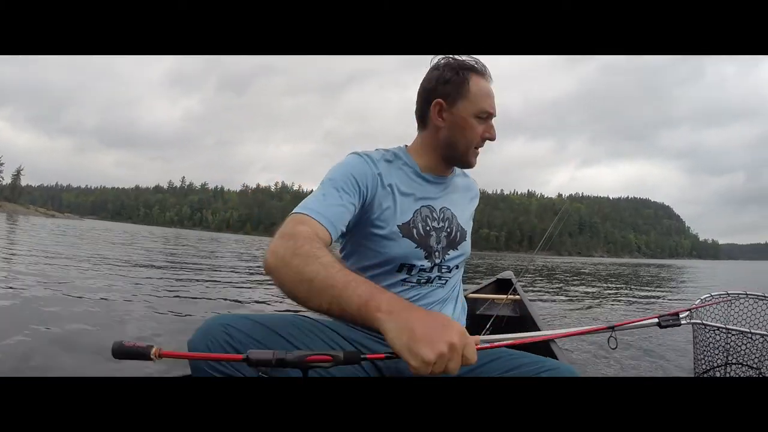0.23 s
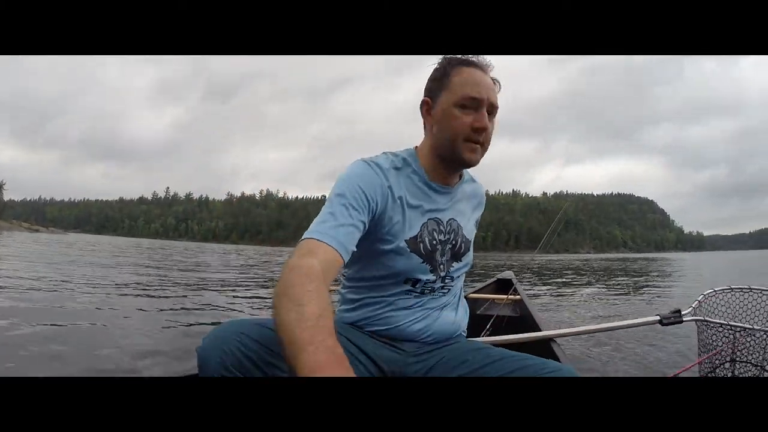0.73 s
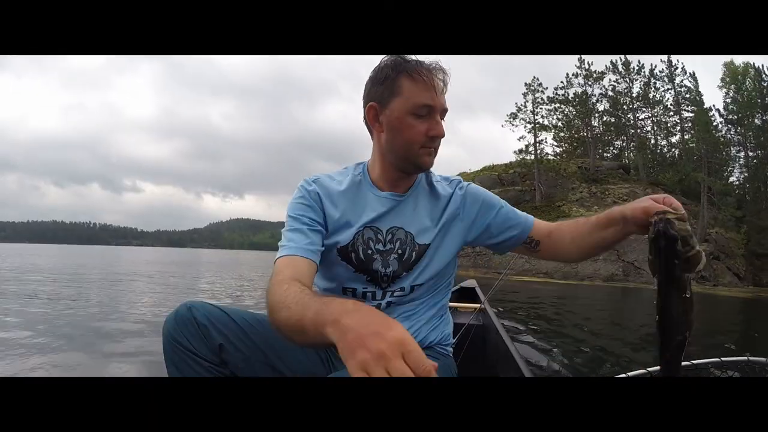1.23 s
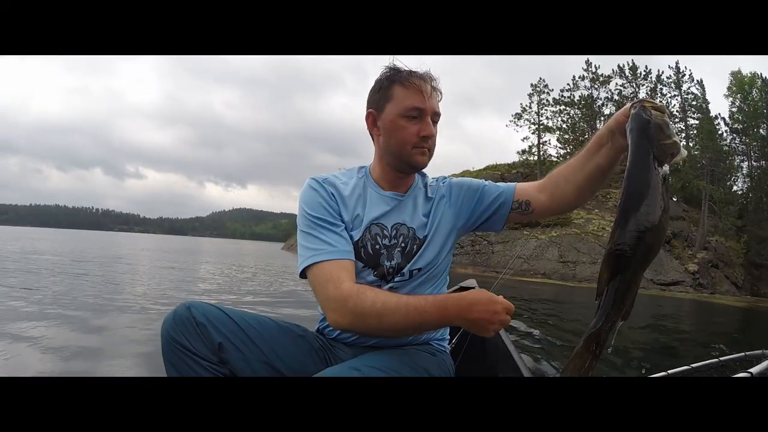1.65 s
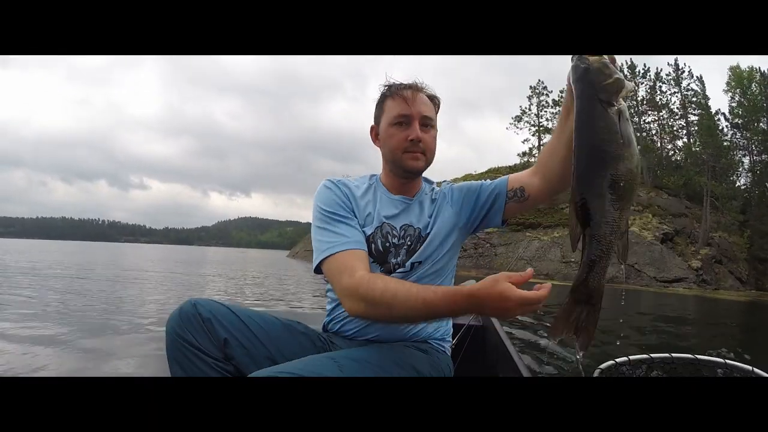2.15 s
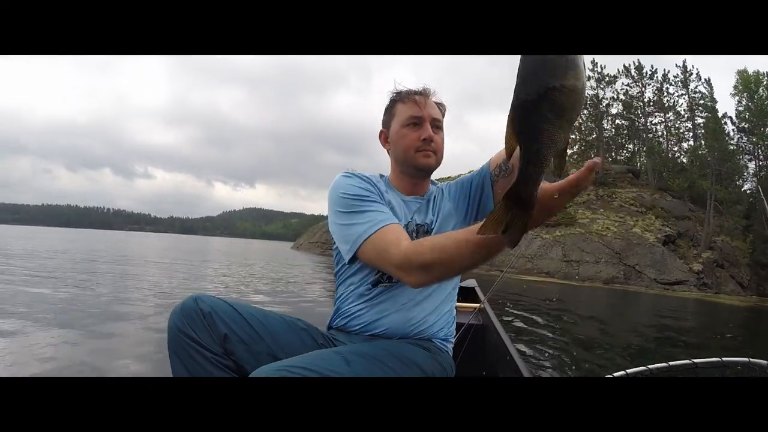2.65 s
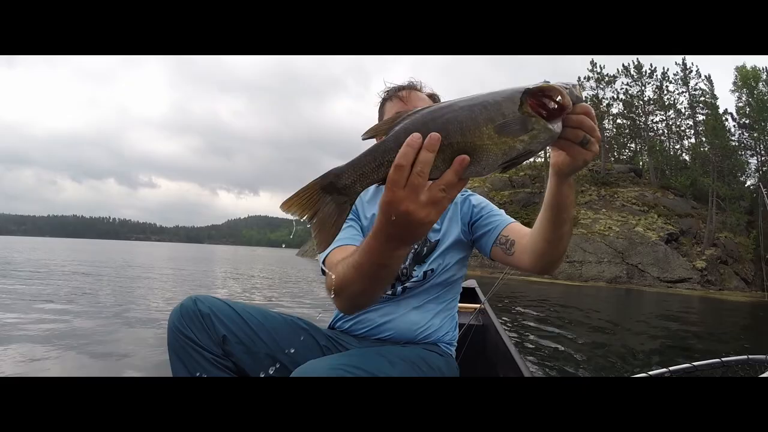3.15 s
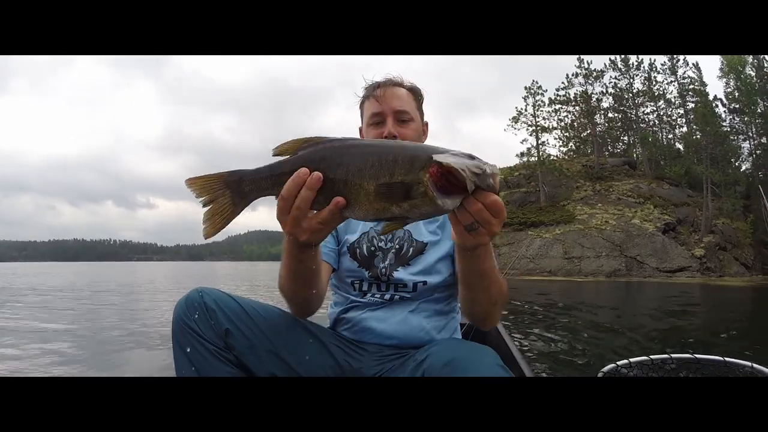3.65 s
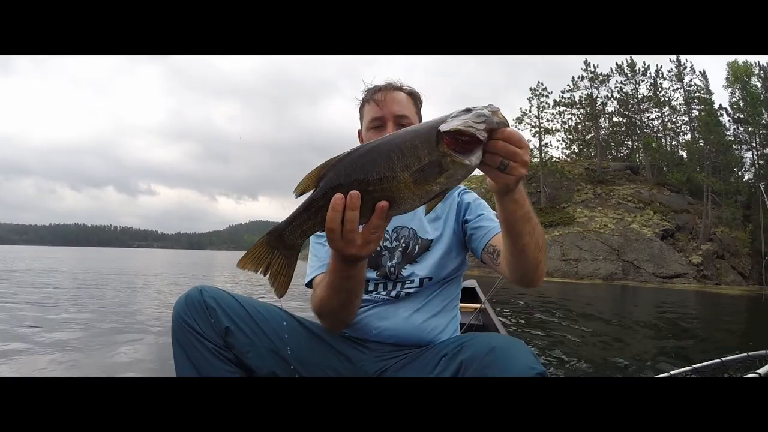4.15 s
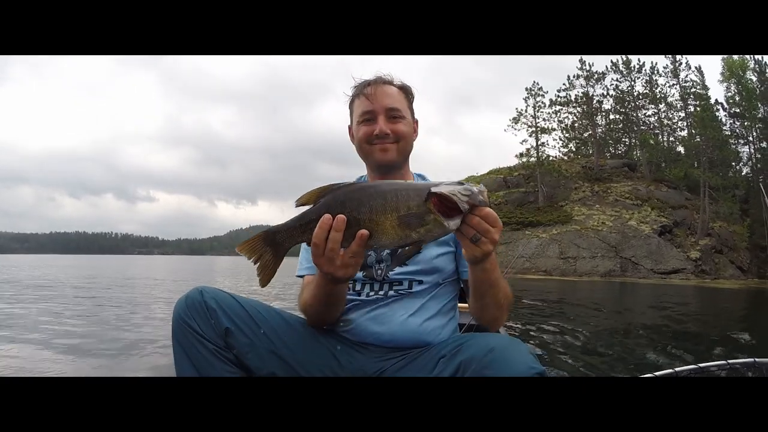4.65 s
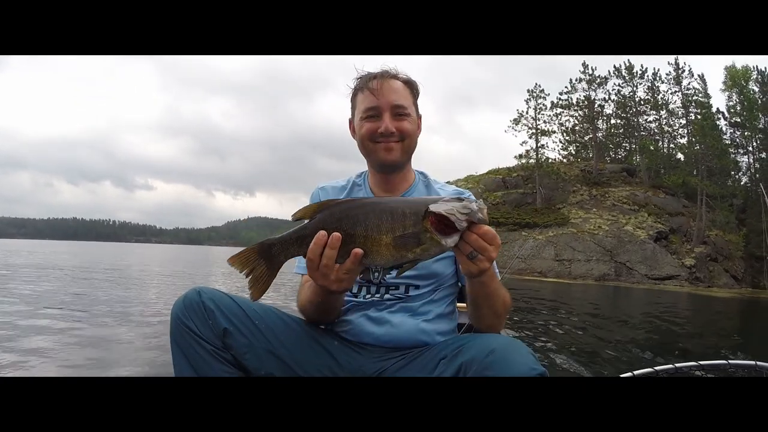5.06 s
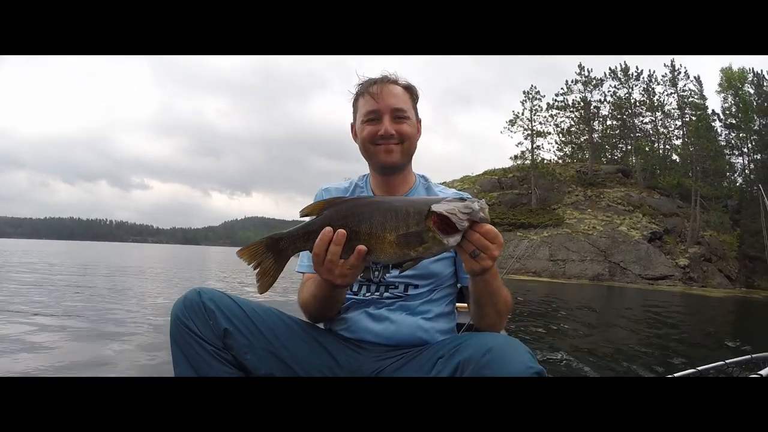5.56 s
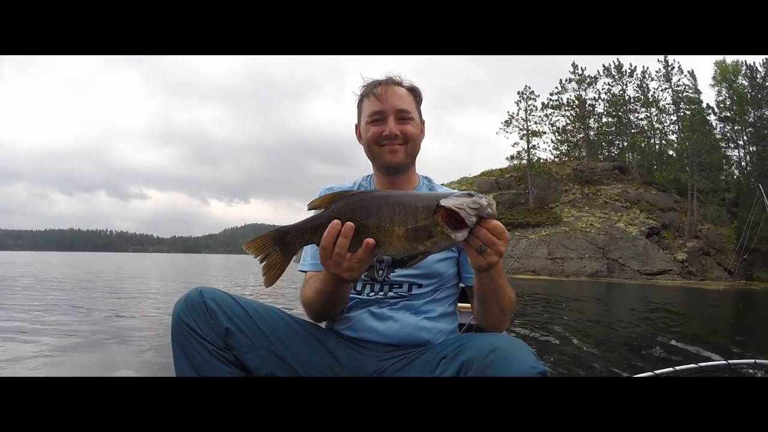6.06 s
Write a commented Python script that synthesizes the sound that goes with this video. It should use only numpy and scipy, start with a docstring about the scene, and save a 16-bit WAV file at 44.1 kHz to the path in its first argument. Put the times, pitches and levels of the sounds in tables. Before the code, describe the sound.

A canoe on a calm lake, heard very close through a camera mounted on its hull. From 0 s, low wind rumble, hiss and a very faint, high pulsing electronic whine sit beneath light taps, scuffs and rod buzz. A hollow knock with a deep thump lands at 0.27 s, then the loudest, a hard overloaded bang, at 0.55 s; the background drops sharply afterwards. More knocks and a rough scrape come at 0.8-0.95 s, with small scuffs and taps until 1.25 s. Rubbing and a short scrape around 1.8 s precede a soft low thud at 2.0 s. Faint bumps continue, with a small scuff at 3.07 s. A sudden close pair of woody clunks hits at 3.4 s, and the background ducks again. Hiss returns by 4.1 s; a tiny falling squeak sounds at 4.38 s, then only barely audible bumps, the last near 6 s, ending at 6.3 s.

```python
"""A canoe on a calm lake, heard by a small camera clamped to the hull while an angler lays down a rod and lifts a fish.
From the start knocks excite the hull's panel modes, thumps its four deep bending modes, and friction noise drives
the panels as scrapes and rubbing, while tapped rod modes buzz; the loudest knock falls at 0.55 s. Sparser, softer
contacts follow until a burst near 3.4 s, then a short sine squeak at 4.38 s and faint last bumps.
Throughout lie filtered-noise wind rumble and hiss, and gated sine tones: a faint whine pulsing with the frames."""
import sys
import numpy as np
from scipy import signal
from scipy.fft import rfft, irfft
from scipy.io import wavfile
from scipy.ndimage import uniform_filter1d

SR = 44100
rng = np.random.default_rng(int(sys.argv[2]) if len(sys.argv) > 2 else 0)


def to_wav(sig):
    """Store sig (one row per channel, or 1-D mono) as 16-bit WAV at the path in sys.argv[1].

    Samples outside -1..1 are clipped; the rate is SR.
    """
    pcm = np.clip(np.atleast_2d(sig), -1, 1) * 32767
    pcm = np.round(pcm).astype(np.int16)
    wavfile.write(sys.argv[1], SR, pcm.T)  # frames by channels


def magnitude_from_level(level_db):
    """Linear magnitude for a level in decibels (20 dB per decade)."""
    exponent = np.asarray(level_db, float) / 20
    return 10 ** exponent


N = 277830
T = np.arange(N) / SR


def level(x, db):
    """Root-mean-square normalisation: scales a sound to an rms level."""
    return x * magnitude_from_level(db) / np.sqrt(np.mean(x ** 2))


def gain_over_time(table):
    """Gain envelope: decibels joined by straight lines between the times of a table."""
    s, db = np.transpose(table)
    return magnitude_from_level(np.interp(T, s, db))


def shaped(x, gain):
    """Linear filtering: multiplies the spectrum by a gain that is a function of Hz."""
    return irfft(rfft(x) * gain(np.maximum(np.fft.rfftfreq(N, 1 / SR), 1)), N)


def ringing(hz, modes):
    """Modal superposition: sums the resonance curves of modes under a steady push."""
    response = 0
    for mode_hz, db, t60 in modes:
        detuning = 2j * np.pi * (hz - mode_hz) * t60 / np.log(1000)
        response = response + magnitude_from_level(db) / np.sqrt(t60) / (1 + detuning)
    return response


def wander(rate):
    """Random modulation: normal random levels, rate of them a second, joined by straight lines."""
    k = int(SR / rate)
    held = np.repeat(rng.standard_normal(N // k + 1), k)
    return uniform_filter1d(held, k)[:N]


def add(out, s, sound, peak_db):
    """Linear superposition: lays a sound at time s, scaled to the given peak."""
    i = int(s * SR)
    out[i:i + len(sound)] += (sound * magnitude_from_level(peak_db) / np.abs(sound).max())[:N - i]


def colour_db(hz, near_hz, hard_db, focus_db, octaves):
    """Driving-point excitation: the nearest panel rings most, and harder contact is brighter."""
    focus = focus_db * np.exp(-(np.log2(hz / near_hz) / octaves) ** 2)
    return focus + hard_db * np.log2(hz / 600)


def spell(start, length, start_db, change_db, edge_s):
    """Contact envelope: the gain of a contact that begins, changes level evenly and ends."""
    contact = np.clip(np.minimum(T - start, start + length - T) / edge_s, 0, 1)
    return contact * magnitude_from_level(start_db + change_db * np.clip((T - start) / length, 0, 1))


# panel modes of the hull, also driven by scrapes and rubbing:
# mode_hz [Hz], relative_level_db [dB], t60_s before damping by the contact [s]
PANEL_MODES = [(241.4, -14, 0.26), (393, -15.5, 0.17), (422, 0.5, 0.078), (486.9, -8, 0.092),
               (570, -2.5, .08), (658, -8, 0.056), (690, -1.5, 0.057), (775, 0.5, 0.053), (934, 0, 0.056),
               (1010, 0, .06), (1170, -24.5, 0.15), (1434, -6.5, .06), (1550, -15, .05),
               (1788, -14.5, 0.079), (1970, -6.5, 0.055), (2336, -22.5, 0.11), (2600, -22, 0.096),
               (2850, -25, 0.053), (3233, -24.5, .09), (3840, -36, 0.046), (4550, -35.5, 0.052),
               (5300, -42.5, 0.011), (6200, -45, 0.045)]
# blows on the hull: start_s [s], peak_db of the ringing [dB], nearest_panel_hz [Hz],
# hardness_db [dB per octave], wide_panels_db [dB]
KNOCKS = [(0.004, -34, 1530, 11, 14), (0.149, -29.5, 434, 12.5, 5.5), (0.192, -33.5, 2580, 13, 8),
          (0.253, -21.5, 596, 1.7, 2), (0.269, -12, 556, 3.5, -3.5), (0.506, -24, 580, 10.5, 6.5),
          (0.548, 1.5, 605, 4.5, 8.5), (0.781, -32.5, 568, -15.5, -9.5), (0.808, -13.5, 537, 1, 1.5),
          (0.876, -19, 806, -0.8, 3.5), (1.013, -33, 990, 9.5, -2), (1.028, -29.5, 1010, 2, -2),
          (1.05, -31, 940, -1, -8), (1.114, -31.5, 1010, -1.5, -2.5), (1.139, -24, 960, -2, -9.5),
          (1.661, -40, 563, -3.5, 1), (1.776, -31.5, 890, 11, -18), (1.919, -38, 1970, 6, 5.5),
          (2.006, -46.5, 1100, 16, 6), (2.38, -45, 800, -2, -8), (2.518, -42, 474, -6.5, -14),
          (2.577, -35, 388, -2.5, -4), (2.604, -35, 575, -1.5, -2.5), (2.657, -48.5, 640, -6, 1),
          (2.761, -49.5, 590, 0, -19), (2.938, -44.5, 387, -5.5, -5), (3.066, -32.5, 1015, -1, -7),
          (3.255, -44, 477, -2, -8), (3.343, -38, 566, -3, 0), (3.386, -40, 386, -5, -10.5),
          (3.409, -10, 920, 4.5, -4.5), (3.423, -15, 833, -6.5, -12.5), (3.499, -39, 577, -8, -13),
          (4.322, -47, 570, -0.5, -2), (4.6, -52, 635, 1, -1), (4.833, -50.5, 575, -2, -6),
          (5.075, -41, 576, -1.5, -0.5), (5.331, -47, 563.5, -11, -1), (5.969, -50, 674.6, -4, 5)]


def knocks(focus_db=10, focus_octaves=0.29, tick_s=.004, tail_db=-24, chatter_db=-14, chatter_s=.007, thin_hz=2600):
    """Impact excitation: each blow rings all panels, the contact ticks and loose gear rattles on."""
    full_scale_contact_s, longer_per_db = .0018, .08  # contact lasts longer by this many dB for each dB lighter
    scatter_db, detune_share = 2.5, .012  # every blow lands elsewhere and loads the panels differently
    full_scale_ring, ring_per_db = .6, -0.02  # share of t60; lighter blows are damped less
    wide_below_hz = 520
    tick_db, rattle_db, bite_db_per_hardness = -49.5, -46, 2.3  # gain of noise; harder blows bite more
    rattle_hz, rattle_octaves, rattle_s = 2900, 0.32, .011  # loose gear shaken by a blow

    out, t = np.zeros(N), T[:SR // 5]
    hz, db, t60 = np.transpose(PANEL_MODES)[:, :, None]
    # the hand or gear still lying on the skin damps the high modes
    t60 = t60 / (1 + (hz / thin_hz) ** 2)
    chance = rng.standard_normal((len(KNOCKS), 3, len(PANEL_MODES), 1))
    bounces = rng.standard_normal((len(KNOCKS), SR // 30)) ** 3 * np.exp(-t[:SR // 30] / chatter_s)

    def click_gain(hz):
        return (hz / 3000) ** 2 / (1 + (hz / 3000) ** 3.6)

    def rattle_gain(hz):
        return ringing(hz, PANEL_MODES) * np.exp(-(np.log2(hz / rattle_hz) / rattle_octaves) ** 2)

    click = level(shaped(rng.standard_normal(N), click_gain), 0)
    shaken = magnitude_from_level(2.3 * wander(150)) * rng.standard_normal(N)
    loose = level(shaped(shaken, rattle_gain), 0)

    for knock, (offset, size, detune), bounce in zip(KNOCKS, chance, bounces):
        s, peak_db, near_hz, hard_db, wide_db = knock
        contact_s = full_scale_contact_s * magnitude_from_level(-longer_per_db * min(peak_db, 0))
        rise = 1 - np.exp(-(t / contact_s) ** 2)
        colour = colour_db(hz, near_hz, hard_db, focus_db, focus_octaves)
        gain = magnitude_from_level(db + colour + wide_db * (hz < wide_below_hz) + scatter_db * size)
        # most energy spreads away fast, a little rings on
        ring = np.clip(full_scale_ring + ring_per_db * peak_db, .1, 1)
        fade = 1000. ** (-t / (t60 * ring)) + magnitude_from_level(tail_db) * 1000. ** (-t / (2.0 * t60))
        # the panels peak about as the contact ends, each with a random phase offset
        phase = 2 * np.pi * hz * (1 + detune_share * detune) * (t - contact_s) + 0.95 * offset
        body = rise * (gain * np.cos(phase) * fade).sum(0)
        # the contact chatters in tiny bounces, each a weaker blow
        chatter = signal.fftconvolve(body, bounce / np.linalg.norm(bounce))[:len(t)]
        add(out, s, body + magnitude_from_level(chatter_db) * chatter, peak_db)
        bite_db, here = peak_db + bite_db_per_hardness * hard_db, int(s * SR)
        tick = rise * np.exp(-t / tick_s) * np.roll(click, -here)[:len(t)]
        rattle = rise * np.exp(-t / rattle_s) * np.roll(loose, -here)[:len(t)]
        add(out, s, tick, bite_db + tick_db)
        add(out, s, rattle, bite_db + rattle_db)
    return out


# deep bending modes of the whole hull, also driven by rocking: mode_hz [Hz], longest_t60_s [s]
DEEP_MODES = [(55, 1), (85, 0.65), (115, 0.57), (149, 0.68)]
# shifts of weight: start_s [s], peak_db before the bass cut [dB], second_mode_db against the third [dB],
# fourth_mode_db against the third [dB], ring_length [share of t60, 0-1]
THUMPS = [(0.004, -23.5, 9, 4, .57), (0.072, -37, -15, 3, .26), (0.192, -32.5, -12, -22.5, 0.47),
          (0.259, -9.5, -6, -15, 0.73), (0.335, -21, -4, -2.5, 0.98), (0.427, -22.5, -18.5, -8, 0.67),
          (0.542, -15, -5.5, 6.5, 0.44), (0.586, -22, 11.5, -2.5, 1), (0.807, -13, -27, -2.5, 0.45),
          (0.883, -21, -4.5, -7, 0.4), (0.969, -27.5, 1, -12, 0.89), (1.098, -37.5, 2, 1, 0.59),
          (1.853, -37, 12, 24.5, 0.56), (1.938, -28, -1, 11, 0.9), (1.974, -25, -13, 14, 0.71),
          (2.005, -17.5, -0.5, -9.5, 0.48), (2.061, -28, 36, 1, 0.39), (2.15, -33.5, 0.5, -15, .51),
          (2.24, -39.5, -13, -2, 0.57), (2.354, -38.5, -7, -2, 0.6), (2.569, -34, 9.5, 12.5, 0.78),
          (2.647, -34, 18, 15.5, 0.76), (2.965, -37, 6, 10.5, 0.56), (3.076, -32, 5, -17, 0.61),
          (3.258, -45.5, 1.5, 20.5, 0.55), (3.34, -22, 20, 15.5, 0.37), (3.361, -27.5, -1.5, -6, 0.29),
          (3.409, -14, -32, -1.5, 0.56), (3.44, -14, -12, -5.5, 0.45), (3.501, -24, -17, -34, 0.67),
          (3.995, -42, -23, -8, 0.84), (4.165, -42, -4, -8, 0.69), (4.273, -39, -13, -29, 0.69),
          (4.333, -31.5, -24, -19, 0.39), (4.427, -43, -22, -2.5, 0.56), (5.07, -47, 1, 2.5, 0.56),
          (5.334, -52, 2, -8, 0.54), (5.8, -47, -15, -7.5, 0.63)]


def thumps():
    """Modal beating: a soft push swells the deep modes in step; they beat together as they fade."""
    push_s, lowest_db = .0072, -11.5  # the lowest mode follows the second, up to the level of the third
    out, t = np.zeros(N), T[:SR // 2]
    hz, t60 = np.transpose(DEEP_MODES)[:, :, None]
    swell = 1 - np.exp(-(t / push_s) ** 2)
    for s, peak_db, second_db, fourth_db, ring in THUMPS:
        share_db = np.array([min(second_db, 0) + lowest_db, second_db, 0, fourth_db])
        share = magnitude_from_level(share_db)[:, None]
        fade = 1000. ** (-t / (t60 * max(ring, .1)))
        body = (share * np.sin(2 * np.pi * hz * (t - 1.5 * push_s)) * fade).sum(0)
        add(out, s, body * swell, peak_db)
    # little sounds below the lowest mode
    return shaped(out, lambda hz: 1 / (1 + (45 / hz) ** 4))


# gear dragged on the hull: start_s [s], length_s [s], start_level_db [dB], change_db [dB],
# nearest_panel_hz [Hz], hardness_db [dB per octave]
SCRAPES = [(0.144, .08, -53, -7, 600, 2), (0.222, 0.045, -52.5, 17, 1100, 0),
           (.498, 0.049, -44.5, -28.5, 3340, 8), (0.774, 0.083, -58, 3, 2600, -3.5),
           (0.822, 0.06, -51, 24, 774, -1), (0.879, 0.096, -36.5, -25, 547, -6.5),
           (1.003, 0.073, -47.5, -12, 990, -4), (1.075, 0.064, -52, 3, 910, -2),
           (1.141, 0.095, -44.5, -7.5, 430, -3), (1.764, 0.077, -47.5, -20, 2170, 3),
           (1.791, .15, -58, -3, 840, 2), (1.834, 0.101, -66.5, 11.5, 3350, 1.5),
           (2.098, 0.16, -69.5, 9, 880, -8), (2.521, 0.15, -57, -7, 752, -2),
           (3.065, 0.063, -44.5, -15.5, 706, -6.5), (3.343, 0.047, -63, -10, 2520, 6),
           (3.413, 0.03, -49.5, -13, 4710, 7)]


def scrapes(slip_db=4, edge_s=0.007, focus_db=12, focus_octaves=0.49, top_hz=6500):
    """Stick-slip friction: dragged gear slips in quick steps and rings the panels near it."""
    def hull_gain(hz):
        return ringing(hz, PANEL_MODES) / (1 + (hz / top_hz) ** 8) / (1 + (330 / hz) ** 6)

    out = np.zeros(N)
    slips = shaped(magnitude_from_level(slip_db * wander(160)) * rng.standard_normal(N), hull_gain)
    for start, length, start_db, change_db, near_hz, hard_db in SCRAPES:
        near = shaped(slips, lambda hz: magnitude_from_level(colour_db(hz, near_hz, hard_db, focus_db, focus_octaves)))
        out += spell(start, length, start_db, change_db, edge_s) * level(near, 0)
    return out


# gear rubbing the hull: time_s [s], relative_level_db [dB]
RUBBING = [(0.0, -57), (0.28, -49.5), (0.46, -63.5), (0.75, -68), (0.97, -52), (1.35, -63.5), (1.67, -64),
           (1.84, -55.5), (2.58, -75.5), (2.95, -71.5), (3.39, -57), (3.58, -83.5), (4.07, -65),
           (4.25, -71), (6.3, -80)]


def rubbing(slip_db=4):
    """Friction-driven vibration: uneven soft rubbing drives mostly the lower panels."""
    slips = magnitude_from_level(slip_db * wander(65)) * rng.standard_normal(N)
    hull = shaped(slips, lambda hz: ringing(hz, PANEL_MODES) / (1 + (hz / 1400) ** 3))
    return gain_over_time(RUBBING) * level(hull, -2)


# modes of the rod and reel: mode_hz [Hz], relative_level_db [dB], t60_s [s]
ROD_MODES = [(1650, -2, .03), (2000, 0, .04), (2600, 0, .045), (2900, -5, .03), (3300, -5, .035),
             (4600, -17, .03)]
# the rod buzzing against the gunwale: start_s [s], length_s [s], start_level_db [dB], change_db [dB]
BUZZES = [(.147, .045, -53, -8), (.188, .05, -53, -8), (.24, .085, -54, -6), (.502, .04, -47, -14),
          (.558, .04, -48, -18), (.812, .085, -60, 3), (1.004, .062, -57, -3), (1.113, .14, -66, -4)]


def rod(skirt_hz=330):
    """Resonance under repeated impact: quick uneven taps keep the rod's modes ringing."""
    def rod_gain(hz):
        return sum(ringing(hz, [mode]) * np.exp(-((hz - mode[0]) / skirt_hz) ** 2) for mode in ROD_MODES)

    taps = magnitude_from_level(4 * wander(120)) * rng.standard_normal(N)
    ring = level(shaped(taps, rod_gain), 0)
    return ring * sum(spell(*row, edge_s=.003) for row in BUZZES)


# one wet squeak: start_s [s], length_s [s], peak_db [dB], from_hz [Hz], to_hz [Hz]
SQUEAK = (4.376, .05, -51, 1020, 900)


def squeak():
    """Frequency modulation: a short falling tone with a slightly unsteady pitch."""
    start, length, peak_db, from_hz, to_hz = SQUEAK
    part = np.clip((T - start) / length, 0, 1)
    hz = (from_hz + (to_hz - from_hz) * part) * (1 + .03 * wander(200))
    return magnitude_from_level(peak_db) * np.sin(np.pi * part ** .6) * np.sin(2 * np.pi * np.cumsum(hz) / SR)


# the hull working under the angler: time_s [s], relative_level_db [dB]
ROCKING = [(0.0, -38), (0.47, -35.5), (0.63, -46), (0.88, -41.5), (1.33, -52.5), (1.56, -58), (1.9, -42.5),
           (2.39, -53), (2.56, -48), (2.77, -57), (3.02, -49), (3.51, -52), (3.72, -57), (4.02, -53),
           (4.32, -55.5), (4.7, -66.5), (5.26, -59), (6.3, -67.5)]
# one value for each deep mode: relative_level_db [dB]
ROCKING_SHARES = [-22, 0, 1.5, -3]


def rocking():
    """Random vibration: small random loads keep the deep modes murmuring."""
    modes = [(hz, db, t60) for (hz, t60), db in zip(DEEP_MODES, ROCKING_SHARES)]
    murmur = shaped(rng.standard_normal(N), lambda hz: ringing(hz, modes))
    return level(murmur, -2.3) * gain_over_time(ROCKING)


# spectrum of wind rumble and hiss: frequency_hz [Hz], relative_density_db [dB per Hz]
AIR_SPECTRUM = [(20, -16), (50, -5.5), (120, -1.5), (200, -10.5), (560, -13), (1500, -21), (3000, -26),
                (6000, -34), (10000, -41.5), (13500, -45.5), (15500, -60.5)]


def air(gust_db=3):
    """Filtered random noise: smooth hiss, with only the bass pushed about by the wind."""
    f, db = np.transpose(AIR_SPECTRUM)
    white = rng.standard_normal(N)
    noise = level(shaped(white, lambda hz: magnitude_from_level(np.interp(np.log(hz), np.log(f), db))), -66)
    bass = shaped(noise, lambda hz: 1 / (1 + (hz / 150) ** 4))
    return noise + bass * (magnitude_from_level(gust_db * wander(5)) - 1)


# tones of the camera's electronics: tone_hz [Hz], relative_level_db [dB]
WHINE_TONES = [(10657, -84), (13183, -91), (11355, -99)]
# where in a frame the whine begins, before and after the pulsing skips: start [share of a frame]
FRAME_STARTS = (.58, .02)


def whine():
    """Gated tones: the camera's electronics sing for half of every frame and start afresh each time."""
    frame_hz, skip_s = 23.976, .78
    frame = (T * frame_hz - np.where(T < skip_s, *FRAME_STARTS)) % 1
    tones = sum(magnitude_from_level(db) * np.sin(2 * np.pi * hz * frame / frame_hz) for hz, db in WHINE_TONES)
    return tones * uniform_filter1d(1. * (frame < .5), size=40)


# the background starts high, dips after the two loudest knocks and creeps back: time_s [s], gain_db [dB]
BACKGROUND_GAIN = [(0, 15), (.553, 12), (.575, -7), (.78, -7.5), (1, 1.5), (3.41, 2.5), (3.47, -14),
                   (3.8, -3.5), (4.1, 2.5), (6.3, 1.5)]


def background():
    """Amplitude modulation: one slow gain moves the air noise and the whine together."""
    return gain_over_time(BACKGROUND_GAIN) * (air() + whine())


def scene():
    """Superposition: hull and gear sounds add to the background."""
    hull = knocks() + thumps() + scrapes() + rubbing() + rocking()
    gear = rod() + squeak()
    return (hull + gear + background())[None]


def top_cut(x):
    """Nothing passes above the cut-off."""
    return signal.sosfilt(signal.butter(12, 15000, fs=SR, output="sos"), x)


def record(dry):
    """Hard clipping: peaks are cut off just below full scale."""
    mix = np.clip(dry, -.99, .99)
    return top_cut(mix)


dry = scene()
out = record(dry)
to_wav(out)
```